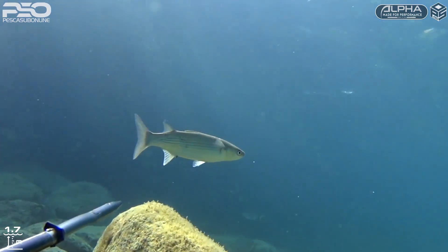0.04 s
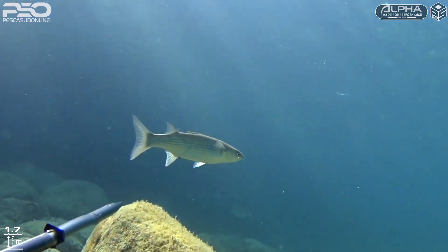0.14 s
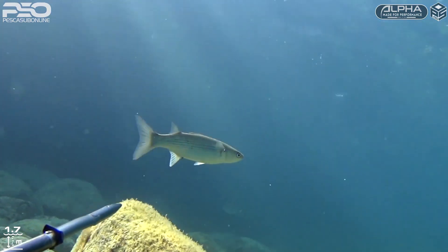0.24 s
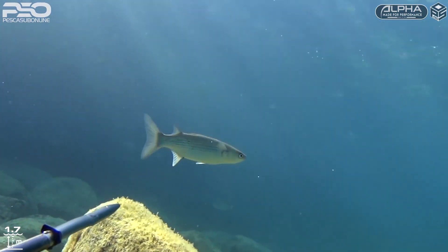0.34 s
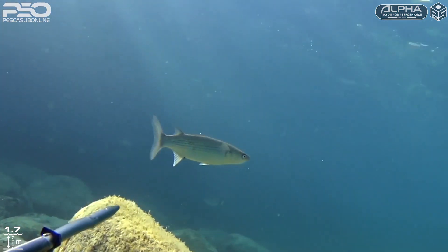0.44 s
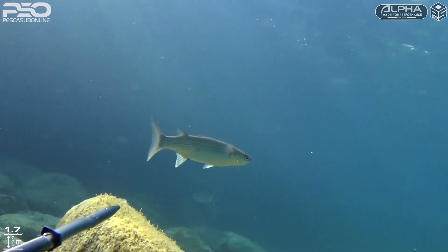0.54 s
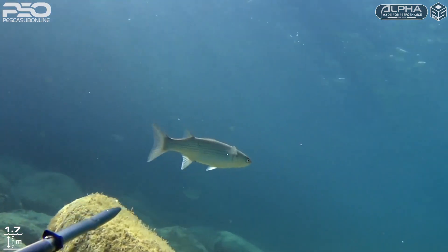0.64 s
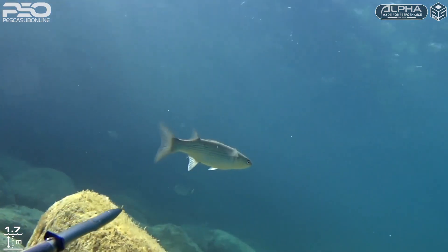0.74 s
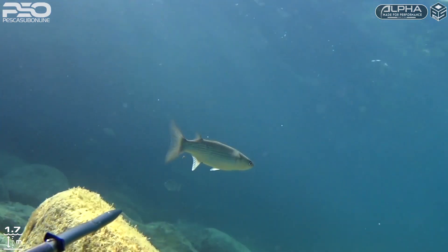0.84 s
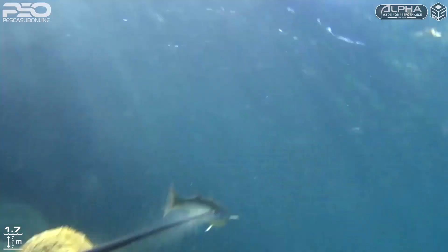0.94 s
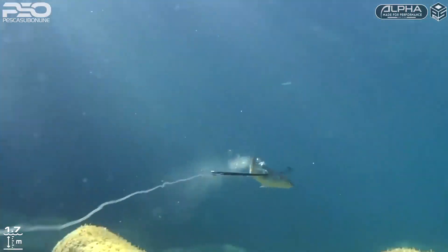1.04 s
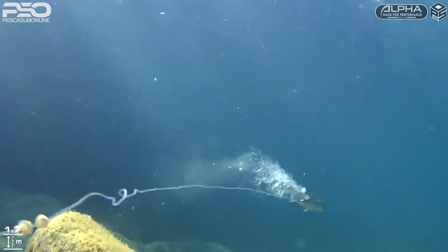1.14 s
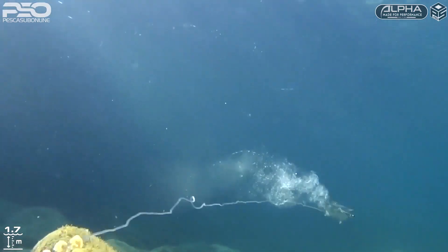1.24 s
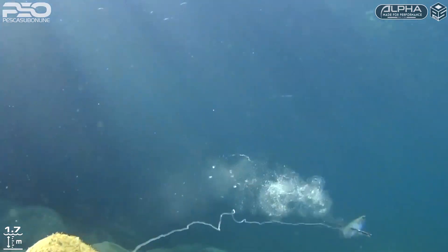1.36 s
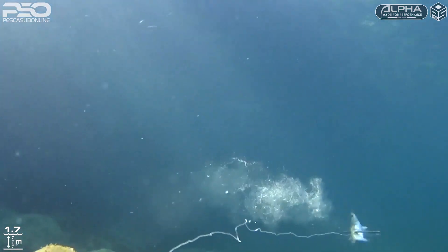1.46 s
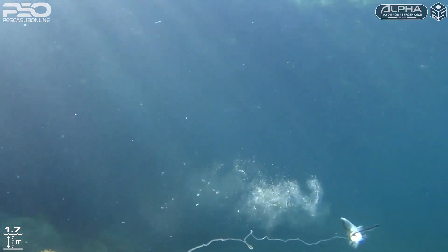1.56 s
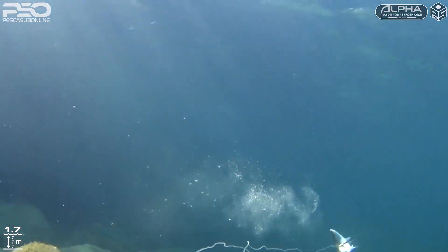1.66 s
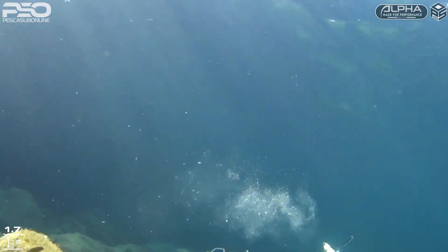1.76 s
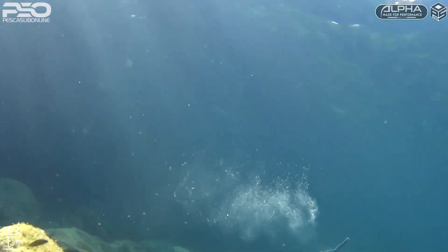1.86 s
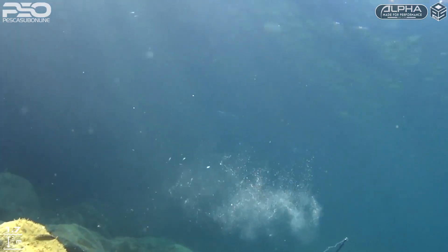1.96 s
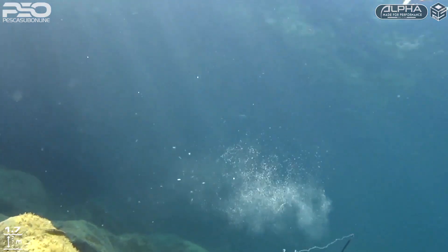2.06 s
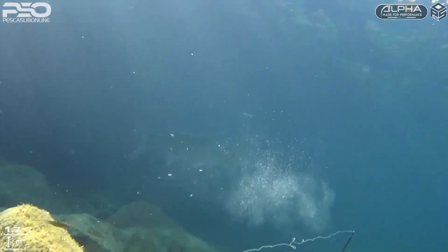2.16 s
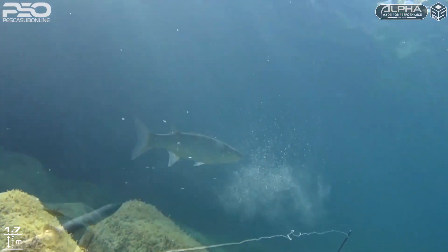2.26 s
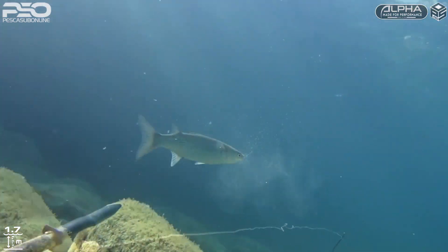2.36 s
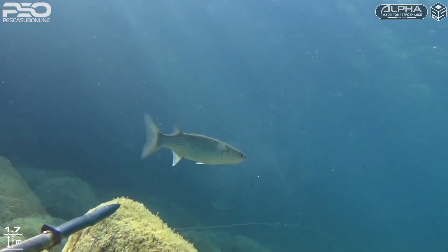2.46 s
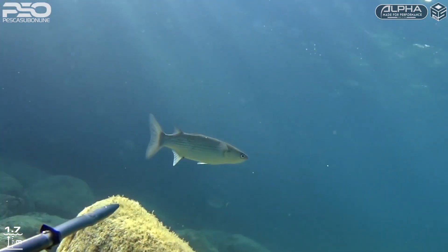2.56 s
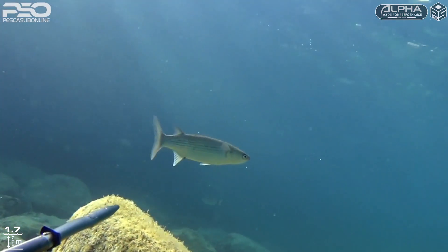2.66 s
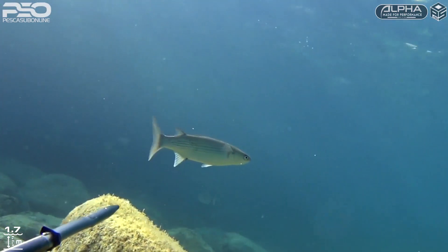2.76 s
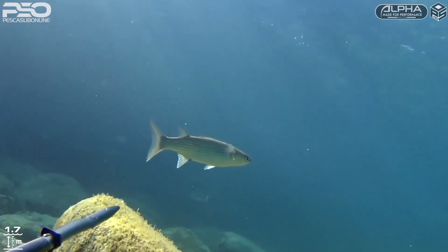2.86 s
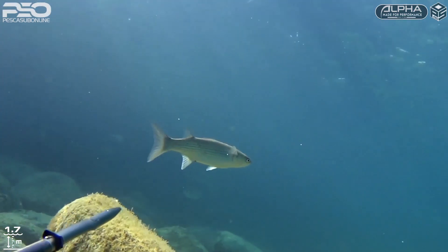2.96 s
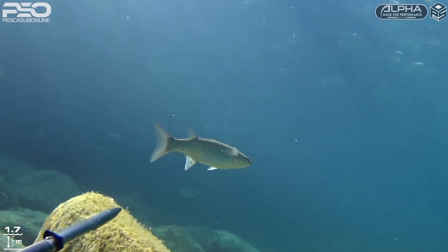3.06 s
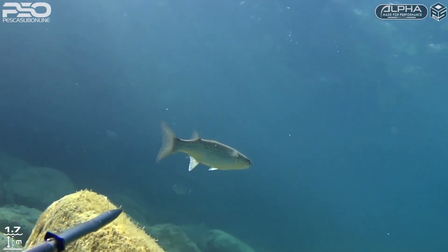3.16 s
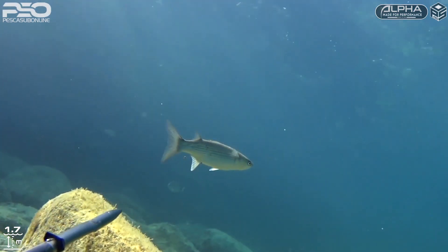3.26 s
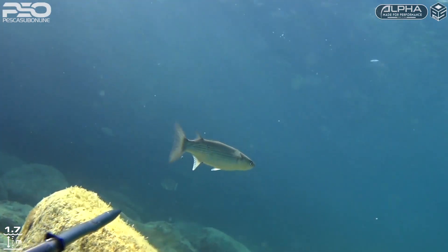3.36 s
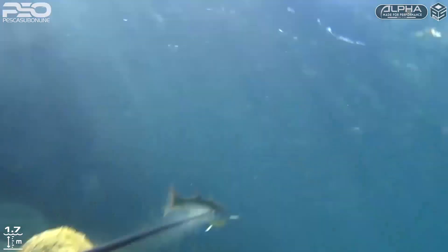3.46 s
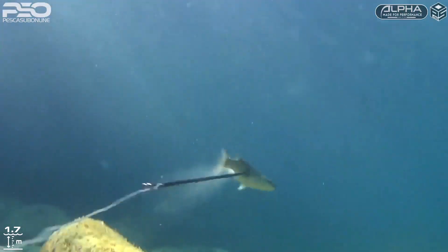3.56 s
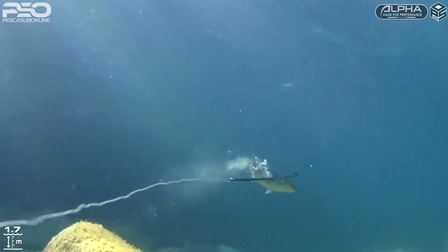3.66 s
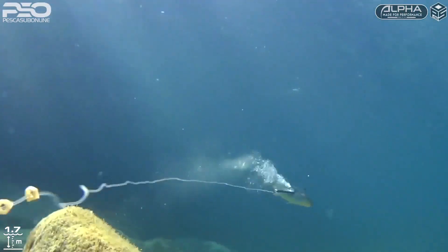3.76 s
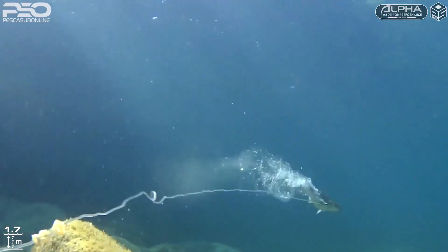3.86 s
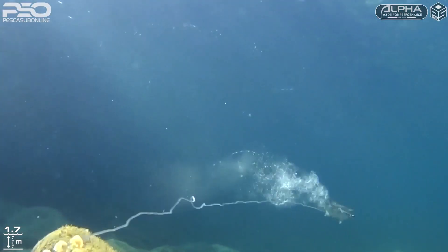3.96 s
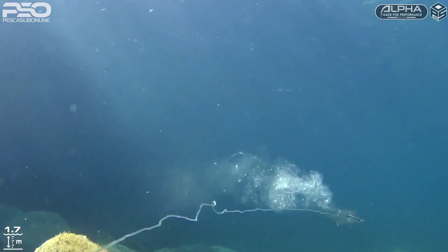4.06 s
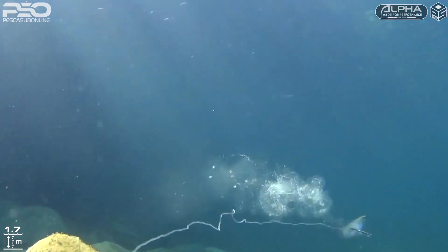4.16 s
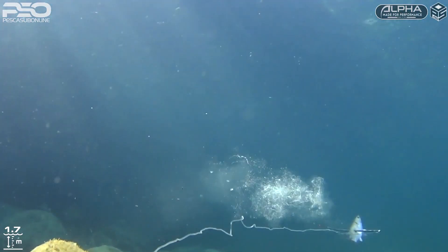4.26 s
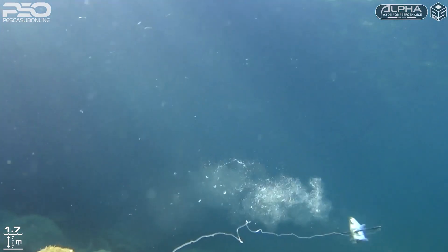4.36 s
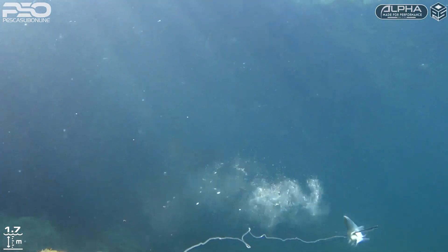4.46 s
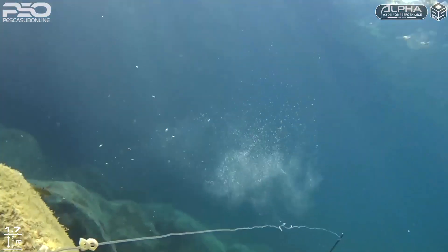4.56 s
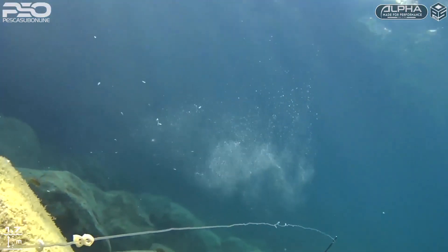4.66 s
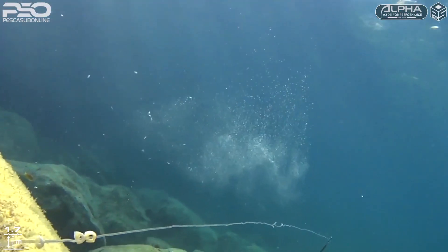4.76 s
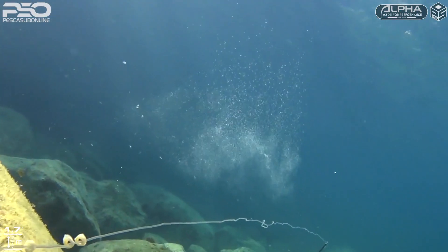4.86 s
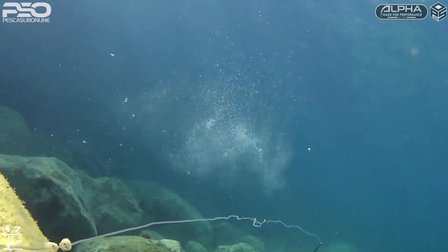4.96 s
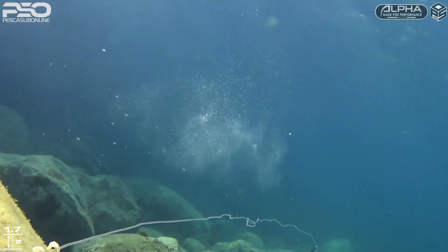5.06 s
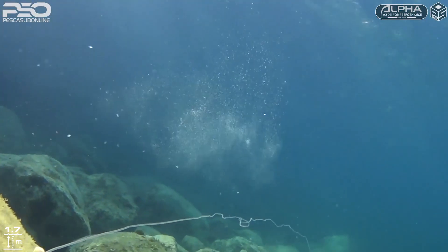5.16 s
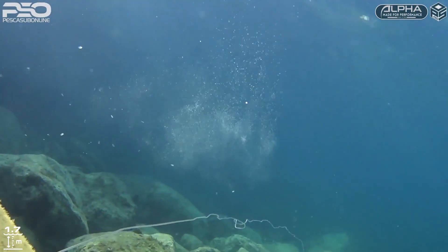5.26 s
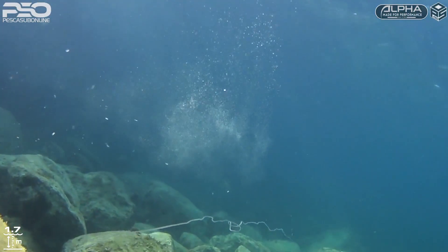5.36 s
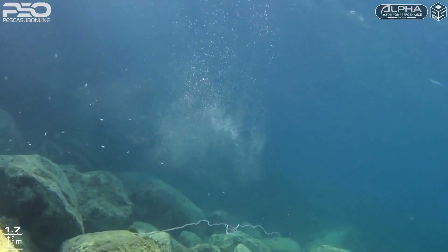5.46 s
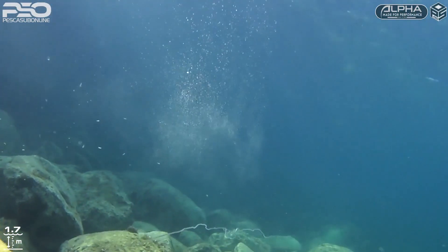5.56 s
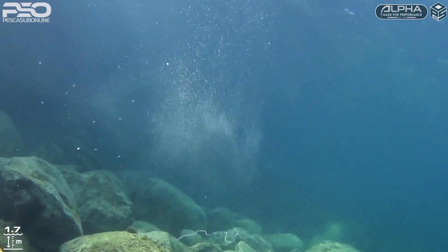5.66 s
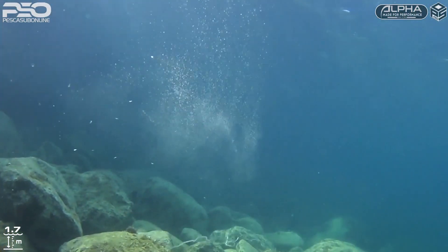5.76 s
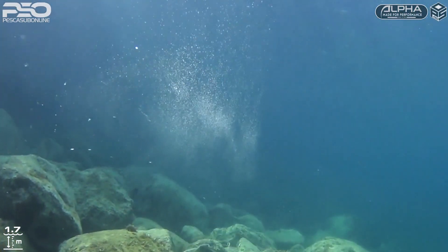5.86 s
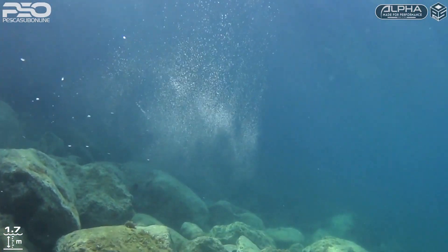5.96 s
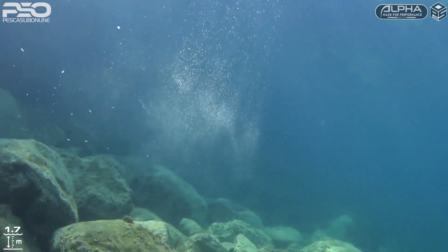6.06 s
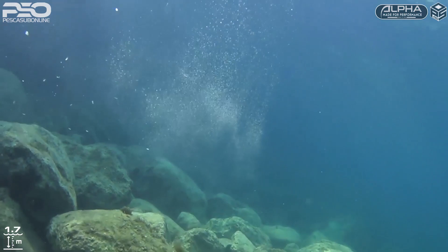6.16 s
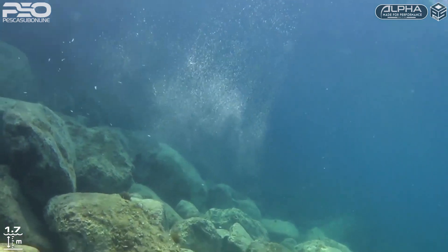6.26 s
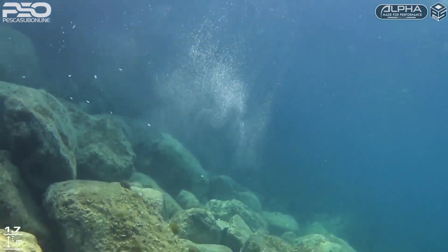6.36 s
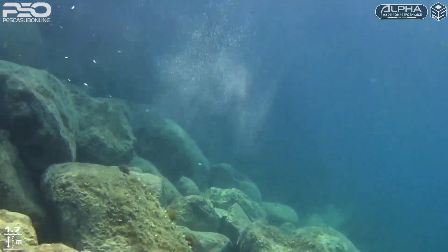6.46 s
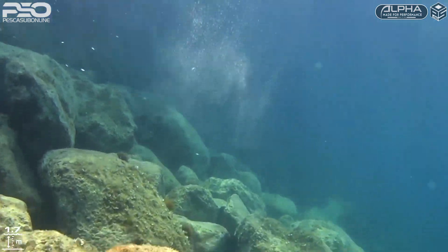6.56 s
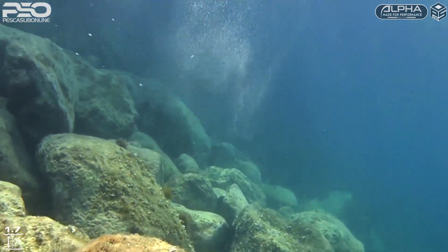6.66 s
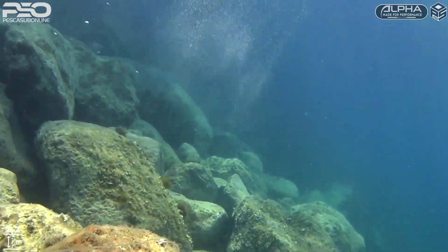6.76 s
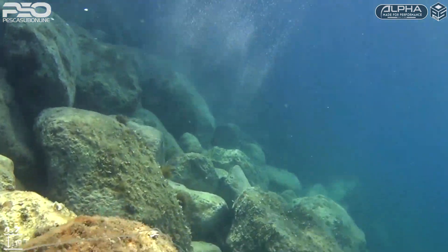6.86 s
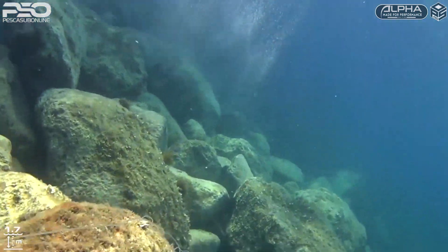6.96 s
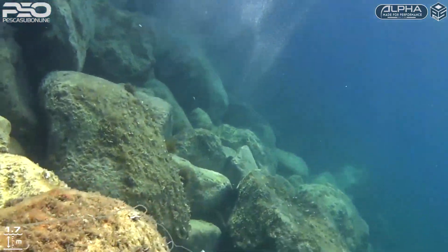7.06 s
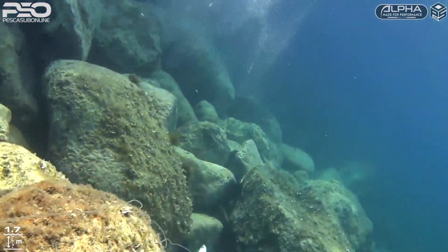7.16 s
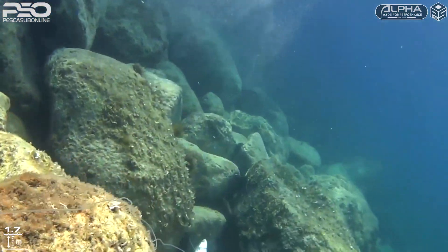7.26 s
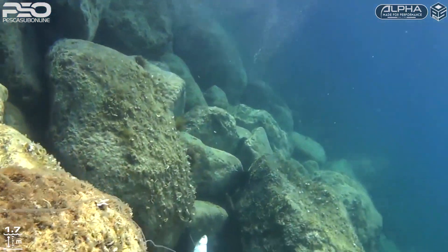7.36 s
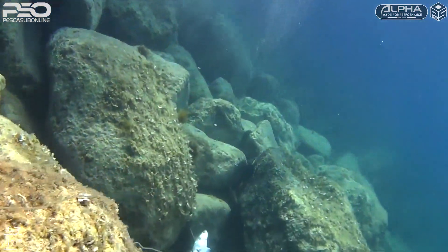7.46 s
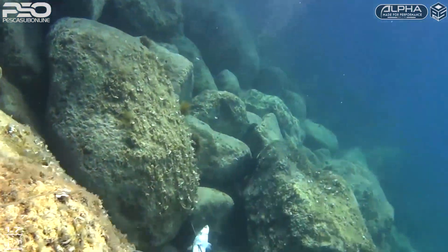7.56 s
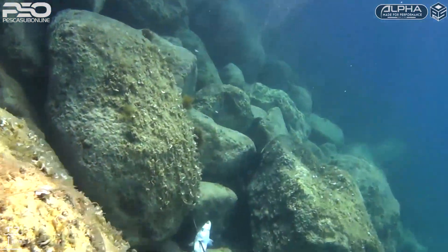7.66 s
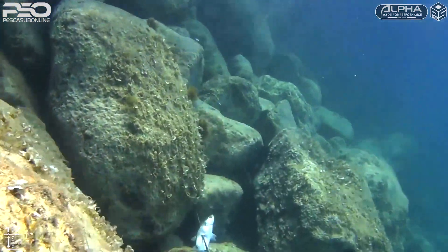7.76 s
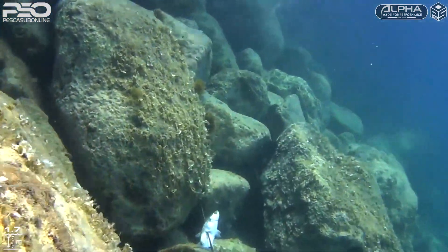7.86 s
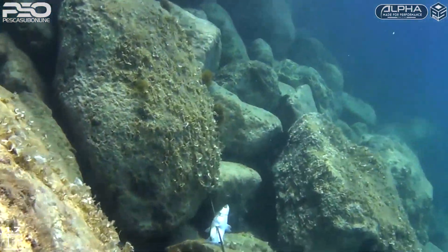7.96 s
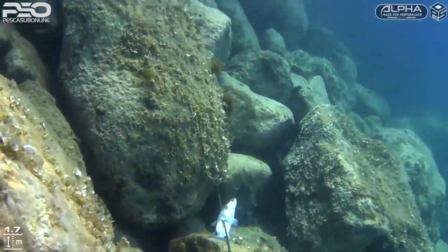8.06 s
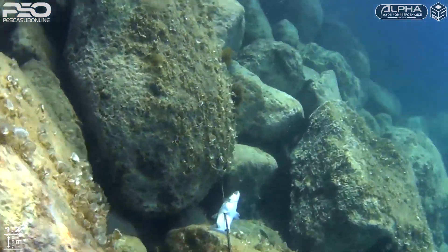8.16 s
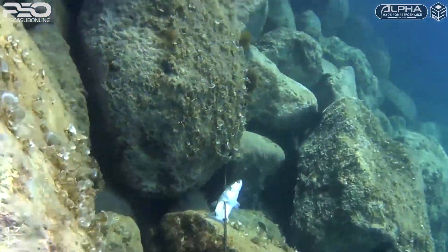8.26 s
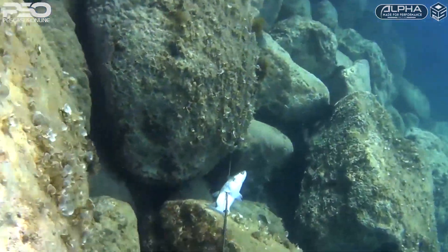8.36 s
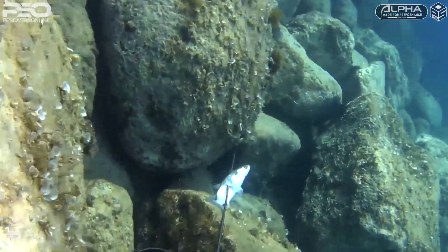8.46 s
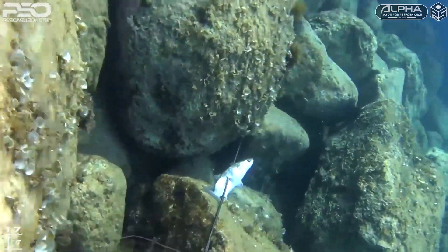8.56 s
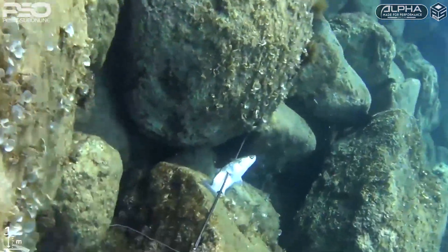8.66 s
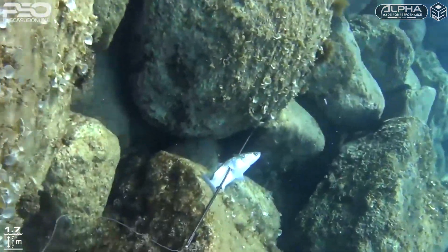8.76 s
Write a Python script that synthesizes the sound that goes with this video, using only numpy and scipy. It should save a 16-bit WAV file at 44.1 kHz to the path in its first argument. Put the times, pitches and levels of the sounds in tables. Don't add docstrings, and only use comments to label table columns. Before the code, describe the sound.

Shallow sea among rocks, heard by a camera in a sealed housing close to a speargun. Quiet hiss and faint knocks, then a sudden clipped blast with steel cracks and churned water, followed by rattling line. The same shot returns slower and deeper. Afterwards line rubs and tugs with hollow knocks, shrimp snap in the distance, and swimming water rumbles louder toward the end.

```python
import sys
import numpy as np
from scipy import signal
from scipy.fft import rfft, irfft
from scipy.io import wavfile
from scipy.ndimage import uniform_filter1d, map_coordinates

SR = 44100
rng = np.random.default_rng(int(sys.argv[2]) if len(sys.argv) > 2 else 0)


def voltage_ratio(level):
    return 10 ** (np.asarray(level, float) / 20)


def output_pcm(signal):
    pcm = np.clip(np.atleast_2d(signal).T, -1, 1) * 32767
    wavfile.write(sys.argv[1], SR, np.round(pcm).astype(np.int16))


N = 388857

CUT_S, SWIM_S = 2.4, 4.555
SLOW, SHOT_S, REPEAT_S = 0.6, 0.94, 3.416402
SWIM_SPEED = 0.787
EDGE_HZ = 11000

# (frequency [Hz], density [dB per Hz])
HISS_MID_SPECTRUM = [(88, -50.5), (150, 5), (189, 3.5), (275, -0.5), (365, 0.5), (730, -3), (970, -3),
                     (1540, -9), (6730, -15.5), (10500, -16.5), (13600, -38.5), (22000, -120)]
# (frequency [Hz], density [dB per Hz])
HISS_SIDE_SPECTRUM = [(88, -51.5), (150, 3.5), (226, -6), (295, 4), (340, -6.5), (460, -3.5), (826, -6),
                      (1360, -11), (1940, -15.5), (10500, -35.5), (13600, -36.5), (22000, -120)]
HISS_DB, HISS_SIDE_DB = -68, -60.5
SWIM_HISS_DB, HISS_GROWTH_DB_PER_S = -69.5, 1.11
# (time [s], flow level [dB])
FLOW = [
    [(0, -76.5), (.5, -64.5), (.84, -77.5), (.95, -50), (1.5, -55), (1.8, -60), (2.4, -65.5)],
    [(4.55, -54.5), (4.68, -76.5), (4.85, -54.5), (5.3, -73), (6.0, -73), (6.5, -54.5), (6.85, -61),
     (7.15, -48), (7.85, -47), (8.45, -39), (8.82, -45)],
]
GUST_S, GUST_DB = 0.024, 0.5
SWELL_DB, SWIM_SWELL_DB = -54.5, -53
DRAG_DB = -12
# (frequency [Hz], density [dB per Hz])
SURGE_SPECTRUM = [(8, 12), (25, -8), (50, -6), (90, -32)]
# (frequency [Hz], density [dB per Hz])
RUMBLE_SPECTRUM = [(26, -38), (45, 1), (70, 0), (130, -4.5), (212, -15), (327, -28.5), (500, -30),
                   (650, -48), (1100, -120)]
# (frequency [Hz], density [dB per Hz])
WASH_SPECTRUM = [(70, -30), (140, 8), (330, -1), (520, -15), (800, -45)]
WASH_DB, WASH_FLOW_DB, WASH_POWER = -53.5, -39.5, 1.37
# (time [s], frequency [Hz], level [dB])
MOAN = [
    (7.93, 400, -72),
    (8.05, 460, -61.5),
    (8.14, 513, -65),
    (8.2, 574, -77),
]
JOLT_DB, JOLT_T60_S, ROCK_HZ, ROCK_WIDTH_HZ, ROCK_MID_DB = -9.5, 0.15, 211, 53, -3.5
# (time [s], peak level [dB], centre [Hz])
SHRIMP_SNAPS = [(.1446, -58, 5740), (.382, -52, 6230), (.6998, -64, 4750), (1.6879, -53, 5250),
                (1.8156, -54, 7800), (2.1598, -55, 5700), (2.2317, -60, 8170), (2.2666, -54, 5540),
                (4.549, -59, 3720), (4.796, -50, 4430), (4.943, -51, 4100), (5.278, -51, 4440),
              (5.409, -49, 4260), (5.4347, -52, 4810), (5.682, -50, 4180), (5.9751, -58, 4260),
              (6.204, -50, 4250), (6.4266, -52.5, 6200), (6.593, -42.5, 4600), (6.726, -47, 4500),
              (6.9594, -52, 4350), (7.655, -48, 4600), (7.832, -47, 4600), (7.8777, -50.5, 5400),
              (7.99, -53, 4360), (8.107, -48.5, 4640), (8.301, -47, 4540), (8.522, -37, 4300),
              (8.5533, -54, 5240), (8.6735, -49, 4750), (8.71, -49, 4680)]

# (frequency [Hz], width [Hz], level [dB])
GUN_MODES = [
    [(380, 98, -1.5), (497, 96, -8.5)],
    [(980, 70, -5)],
]
# (frequency [Hz], width [Hz], level [dB])
SWIM_GUN_MODES = [
    [(287, 68, -4), (174, 78, -5), (620, 100, -16.5)],
    [(765, 66, 0.17), (638, 76, -2.2)],
]
# (start [s], length [s], low mode level [dB], high mode level [dB])
RUBS = [(0.045, 0.025, -52, -86), (0.094, 0.036, -97, -59), (0.427, .1, -89, -90), (0.676, 0.07, -91, -72),
        (0.867, 0.088, -80, -72), (1.47, 0.89, -68.5, -70.5), (4.562, 0.4, -81, -72),
        (4.772, 0.12, -48, -78), (4.996, 0.11, -54, -60.5), (5.112, 1.5, -59.5, -72),
        (6.388, 0.3, -63.5, -66.5), (7.106, 0.79, -84, -67), (7.945, 0.32, -61, -66),
        (8.364, 0.61, -75, -69.5)]
RUB_ATTACK_S, RUB_RELEASE_S = 0.034, 0.018
SCRAPE_DB, SCRAPE_T60_S = -25, 0.5
# (time [s], peak level [dB], ring [Hz], tick against ring [dB])
EARLY = [(0.056, -50.5, 454, -28), (0.073, -53.5, 292, -23), (0.116, -71, 980, -20), (0.146, -63, 990, 4),
         (0.427, -60, 390, -23), (0.519, -64, 254, -17), (0.7, -57, 1050, 5.5)]
# (time [s], peak level [dB], ring [Hz], tick against ring [dB])
RATTLE = [(1.1634, -53, 853, -34.5), (1.2148, -42, 940, -16), (1.2171, -43, 545, -38),
          (1.2601, -42.5, 620, -38), (1.2608, -30, 424.5, -52), (1.3214, -52, 870, -29),
          (1.3523, -52, 960, -22), (1.3751, -55.5, 485, -30.1), (1.3971, -40, 450, -38),
          (1.4703, -59.5, 330.5, -30.1), (1.4896, -54, 139, -40.1), (1.5391, -58.5, 701, -25),
          (1.5904, -50, 198, -30.1), (1.8193, -56, 374, -22.1), (1.903, -50, 324, -28.1),
          (1.925, -51.5, 264, -28.1), (2.0791, -60, 387, -13), (2.3761, -58, 484, -26.1)]
# (time [s], peak level [dB], ring [Hz], tick against ring [dB])
TUGS = [(4.649, -64, 345, -12), (4.804, -40, 279, -32), (4.849, -45, 329, -30), (5.005, -40.5, 281, -27),
        (5.173, -58, 291, -25), (5.198, -50, 294, -31), (4.858, -53, 169, -33), (5.065, -60, 280, -27),
        (5.437, -51, 163, -35), (5.467, -55, 182, -35), (5.504, -60, 156, -35), (5.625, -56, 265, -30),
        (5.668, -66, 179, -30), (5.306, -51, 285, -27), (5.369, -54.5, 297, -17), (5.429, -51, 278, -24.5),
        (5.494, -44, 283, -33), (5.606, -51, 265.5, -26), (5.809, -53, 285, -27), (6.055, -56, 179, -29),
        (6.233, -49.5, 287, -32), (6.429, -54, 302, -30), (6.52, -52, 280, -30), (5.88, -50, 290, -25),
        (5.965, -55, 275, -18), (6.017, -48, 262, -27), (6.168, -56, 278, -24), (6.203, -50.5, 287, -16),
        (6.305, -64, 308, -22), (6.412, -49.5, 289, -25), (6.549, -45.5, 267, -13), (6.61, -52.5, 280, -25)]
# (time [s], peak level [dB], ring [Hz], tick against ring [dB])
PINGS = [(4.853, -58, 793, -25), (5.045, -60, 755, -25), (5.808, -63, 686, -25), (5.88, -65, 657, -28),
         (5.965, -70, 650, -25), (6.028, -60, 665, -20), (6.095, -66, 710, -25), (6.58, -54, 646, -25),
         (6.4, -49, 714, -25), (6.518, -49, 596, -27), (6.555, -54.5, 665, -23), (7.127, -62.5, 810, 8),
         (7.325, -57.5, 590, -18.5), (7.444, -56, 765, 0), (7.515, -57.5, 715, -20), (7.555, -58, 770, -5),
         (7.624, -57, 740, -3), (7.746, -45.5, 748, -37), (7.345, -62, 780, -20), (7.378, -62, 745, -20),
         (7.96, -74, 780, -20), (8.172, -67, 760, -20), (8.04, -59.5, 710, -26), (8.104, -52.5, 754, -24),
         (8.228, -57.5, 660, -18)]
# (time [s], peak level [dB], ring [Hz], tick against ring [dB])
TAPS = [(6.5, -53, 640, -19), (5.003, -63, 990, -25), (4.4, -54, 640, -19), (5.2764, -45, 670, -10),
        (5.2783, -49, 970, -21), (5.279, -54, 1260, -21), (5.2763, -62, 2130, -5), (4.5, -47, 750, -17),
        (3.8, -61, 810, -18), (6.3955, -41, 620, -25)]
# (time [s], peak level [dB], centre [Hz])
CLICKS = [(.6991, -50, 1300), (1.108, -25, 2200), (1.1845, -35, 1300), (1.2135, -45, 1600),
          (1.2185, -47, 1500), (1.2615, -48, 1700), (1.29, -58, 1700), (1.3215, -47, 1100),
          (1.397, -53, 1100), (1.41, -56, 1400), (2.085, -62, 1080), (2.266, -60, 1150), (4.79, -53, 800),
          (5.001, -48, 900), (5.277, -49, 2300), (5.434, -46, 1000), (6.396, -48, 900), (6.3965, -54, 4000),
          (6.518, -51, 700), (8.228, -50, 900)]

# (time [s], violence [dB])
CHURN = [
    (.951, 2.5),
    (.968, 1),
    (1.02, 0.5),
    (1.045, -10),
    (1.095, -13),
    (1.125, -28),
    (1.175, -26.5),
    (1.225, -34.5),
    (1.5, -55.5),
]
# (level at full violence [dB], slope [dB per dB])
CHURN_LAW = [
    (-25, 0.6),
    (-25.5, 0.94),
    (-40, 1.4),
    (0.5, -0.08),
]
# (frequency [Hz], density [dB per Hz])
HEAVE_SPECTRUM = [(15, -10.5), (45, -8.5), (90, 5.5), (150, -3.5), (250, -55)]
# (frequency [Hz], density [dB per Hz])
ROAR_SPECTRUM = [(88, -33), (150, 0.5), (194, -3), (319, -4.5), (475, -14.5), (535, -12.5), (950, -11),
                 (1350, -24.5), (2500, -38), (3250, -60.5), (5500, -120)]
# (frequency [Hz], density [dB per Hz])
FIZZ_SPECTRUM = [(1060, -23.5), (1800, 4.5), (2140, -20), (3460, -12), (4880, -8.5), (7540, -13.5),
                 (9370, -24.5), (10800, -37.5), (14000, -69.5), (22000, -120)]
# (time [s], peak level [dB], centre [Hz])
GLINTS = [(1.0265, -36, 6000), (1.062, -39, 6000), (1.084, -41, 4860), (1.128, -54, 5700),
          (1.143, -51, 3180), (1.152, -55, 2900), (1.156, -57, 7200), (1.16, -54, 6000), (1.18, -60, 6500),
          (1.212, -55, 4400), (1.265, -62, 5800), (1.33, -60, 8400), (1.385, -62, 8400), (1.48, -60, 7900),
          (1.62, -62, 8100), (1.74, -62, 5900), (2.07, -62, 6200), (2.31, -62, 8100)]
# (frequency [Hz], width [Hz], level [dB])
QUIVER = [(5700, 220, 0), (6770, 200, -5), (8050, 200, -2), (8380, 160, -2)]
QUIVER_DB = -90
# (time [s], peak level
# [dB], centre [Hz])
CRACKS = [(0.9533, -17, 2876), (0.958, -14, 4840), (0.9624, -21.5, 2496), (0.9684, -33.5, 2930),
          (0.9786, -41.5, 2524), (0.9862, -42, 2565), (0.9944, -28.5, 2548), (0.9988, -19.5, 4900),
          (0.9992, -19.5, 8850), (1.0108, -31, 5890), (1.0151, -31, 2476), (1.027, -40.5, 5770),
          (1.0433, -35.5, 2770), (1.062, -42, 6130), (1.066, -26, 3003), (1.0846, -46, 4620),
          (1.0465, -28, 2120), (1.052, -42.5, 4750), (1.057, -35, 2900), (1.0715, -34, 3000),
          (1.076, -36, 4890), (1.079, -42.5, 2390), (1.089, -44, 3200), (1.0935, -50, 3400),
          (1.1025, -42, 1700), (1.035, -34.5, 2800), (1.1083, -22, 3000), (1.213, -49, 4300)]
# (time [s], peak level [dB], ring [Hz], tick against ring [dB], left-right [dB])
RECOIL = [(.9535, -22, 380, -10, -0.5), (.955, -13, 850, -16.5, 2.5), (.963, -21, 565, -31.5, 2),
          (.978, -19, 433, -14.5, -4.5), (.987, -24, 596, -25.5, 9), (.991, -26, 1080, -26.5, -2),
          (.997, -15.5, 1280, -10.5, 1), (1.012, -21, 794, -30, 9.5), (1.015, -34.5, 390.4, -23, 1.5),
          (1.017, -19, 890, -20.5, -1.5), (1.025, -21, 544, -23.5, 5), (1.038, -25.5, 398.5, -20.5, 1.5),
          (1.045, -28.5, 1266, -17.5, 2), (1.062, -25, 390, -17.5, 2), (1.071, -33, 940, -9.5, 18),
          (1.094, -58, 820, -8, -18), (1.102, -34, 388, -34, -7.5), (1.108, -19, 845, -26, 4.5),
          (.9545, -21, 1500, -22.5, 1), (.96, -21.5, 1900, -23.5, -0.5), (.9655, -26, 1490, -21, 2.5),
          (.9795, -19.5, 1300, -24.5, -2.5), (.994, -24.5, 1700, -24.5, 3.5),
          (1.019, -21.5, 1360, -23.5, 2.5), (1.0645, -28, 1200, -19.5, 0), (1.1085, -28, 1590, -15, 9)]
# (time [s], peak level [dB], frequency [Hz], driven [s], t60 [s])
SLAMS = [
    (0.955, -9.5, 194, 0.0082, 0.037),
    (.9774, 6.5, 184, .0135, .0028),
    (1.1, -18.5, 200, 0.0088, 0.067),
]
# (time [s], peak level [dB], frequency [Hz], driven [s], t60 [s])
SHELL = [(.955, -23, 886, 0.0073, .008), (1.0115, -16.5, 553, 0.0037, 0.0066),
         (1.0204, -7, 333.4, 0.0105, 0.0051), (1.0176, -6.5, 858, 0.0014, 0.0049),
         (1.04, -21.5, 417, 0.0037, .01), (1.144, -36.5, 346, 0.012, 0.025), (1.16, -43, 859, 0.012, 0.027)]
# (time of the top [s], peak level [dB], width [s])
PUSHES = [(0.975, -3.5, 0.0035), (1.008, -18.5, 0.0014), (1.0347, -5, 0.0017), (1.068, -10, 0.0026),
          (1.114, -26, 0.002), (1.131, -20.5, 0.0015), (0.9539, -9.5, 0.0021), (1.0002, -10.5, 0.0011),
          (0.9646, -9.5, .001), (1.0487, -10.5, .0012), (1.098, -23, .002), (1.489, -39.5, 0.0059),
          (1.505, -49, .003), (1.597, -46, 0.00093), (1.612, -51, 0.0016), (1.625, -46, 0.0064)]
# (time of the top [s], peak level [dB], width [s])
PULLS = [(0.9524, -9, 0.00045), (0.9782, -11.5, 0.00057), (.961, -11, 0.0026), (1.0032, -13.5, 0.0024),
         (1.010, -12.5, 0.002), (1.0383, -9.5, 0.002), (1.055, -19.5, 0.0011), (1.080, -18, 0.0013),
         (1.499, -33.5, .0025), (1.6, -38, 0.0013), (1.61, -45, 0.0013)]
PUSH_LEAN = 0.11
KICK_S, KICK_DB, KICK_WIDTH_S, KICK_LEAN = 0.9531, -4.5, 0.0011, 0.7


def evened(x):
    return x / np.sqrt(np.mean(x ** 2) + 1e-20)


def coloured(points, speed=1, count=N):
    hz = np.fft.rfftfreq(count, 1 / SR) / speed + 1e-3
    f, db = np.transpose(points)
    gain = voltage_ratio(np.interp(np.log(hz), np.log(f), db, -90, -90))
    return evened(irfft(rfft(rng.standard_normal(count)) * gain, count))


def lumps(s, depth_db):
    size = max(int(s * SR), 2)
    drift = uniform_filter1d(uniform_filter1d(rng.standard_normal(N), size), size)
    return evened(voltage_ratio(depth_db * evened(drift)))


def gains(tables):
    t = np.arange(N) / SR
    out = 0
    for s, *columns in map(np.transpose, tables):
        out = out + np.array([voltage_ratio(np.interp(t, s, db, -150, -150)) for db in columns])
    return uniform_filter1d(out, size=60, axis=1)


def resonate(x, hz, width):
    turn = np.exp(2j * np.pi * np.cumsum(hz * np.ones(len(x))) / SR)
    r = np.exp(-np.pi * width / SR)
    once = signal.lfilter([1 - r], [1, -r], x / turn)
    twice = signal.lfilter([1 - r], [1, -r], once)
    return 2 * (turn * twice).real


def ports(mid, side):
    return np.array([mid + side, mid - side])


def add(mix, s, sound):
    part = mix[:, round(s * SR):][:, :sound.shape[1]]
    part += sound[:, :part.shape[1]]


def wake(rows, t60):
    t = np.arange(N) / SR
    out = 0
    for s, db, *_ in rows:
        u = np.maximum(t - s, 0)
        out = out + voltage_ratio(db - 60 * u / t60) * np.minimum(u / 0.0013, 1)
    return out


def hiss():
    full, slow = (ports(voltage_ratio(HISS_DB) * coloured(HISS_MID_SPECTRUM, v),
                        voltage_ratio(HISS_SIDE_DB) * coloured(HISS_SIDE_SPECTRUM, v)) for v in (1, SWIM_SPEED))
    t = np.arange(N) / SR
    grown = voltage_ratio(SWIM_HISS_DB + HISS_GROWTH_DB_PER_S * (t - SWIM_S) + 2.0 - HISS_DB)
    return np.where(t < CUT_S, full, grown * slow) * lumps(0.03, 0.61)


def water(surge, rumble):
    out = 0
    for gain, points, lean, lead, apart in ((surge, SURGE_SPECTRUM, 0.2, 0.4, 0.25),
                                            (rumble, RUMBLE_SPECTRUM, 0.15, 0.3, 0.4)):
        mid = coloured(points)
        side = -lean * mid + lead * signal.hilbert(mid).imag + apart * coloured(points)
        out = out + gain * lumps(0.029, 0.47) * ports(mid, side)
    return out


def wash(flow):
    gain = voltage_ratio(WASH_DB) * (flow / voltage_ratio(WASH_FLOW_DB)) ** WASH_POWER * lumps(0.01, 2.5)
    gain = gain * (np.arange(N) > SWIM_S * SR)
    return gain * ports(coloured(WASH_SPECTRUM), 0.73 * coloured(WASH_SPECTRUM))


def moan():
    t = np.arange(N) / SR
    s, hz, db = np.transpose(MOAN)
    whistle = evened(resonate(rng.standard_normal(N), np.interp(t, s, hz), 45.0))
    mid = voltage_ratio(np.interp(t, s, db, -150, -150)) * whistle
    return ports(mid, -0.2 * mid)


def rocking(gain):
    hz = ROCK_HZ * np.where(np.arange(N) < CUT_S * SR, 1, SWIM_SPEED)
    mid, side = (evened(resonate(d, hz, ROCK_WIDTH_HZ)) for d in rng.standard_normal((2, N)))
    return gain * ports(voltage_ratio(ROCK_MID_DB) * mid, side)


def sea():
    flow = gains(FLOW)[0] * lumps(GUST_S, GUST_DB)
    swell = np.where(np.arange(N) < CUT_S * SR, voltage_ratio(SWELL_DB), voltage_ratio(SWIM_SWELL_DB)) * lumps(GUST_S, GUST_DB)
    jolts = voltage_ratio(JOLT_DB) * wake(EARLY + RATTLE + TUGS, JOLT_T60_S)
    return wash(flow) + water(swell + voltage_ratio(DRAG_DB) * flow, flow) + moan() + rocking(jolts)


def snaps(rows, width, t60, side, fall=0):
    out, t = np.zeros((2, N)), np.arange(1300) / SR
    for s, db, hz in rows:
        pitch = hz * (1 - fall * t / t60)
        a, b = (evened(resonate(rng.standard_normal(len(t)), pitch, width)) for _ in range(2))
        add(out, s - 0.0005, voltage_ratio(db - 11.0 - 60 * t / t60) * ports(a, side * b))
    return out


def shrimps():
    return snaps(SHRIMP_SNAPS, width=1400.0, t60=0.03, side=0.49)


def strokes():
    t = np.arange(N) / SR
    out = 0
    for s, length, *db in RUBS:
        attack, release = (t - s) / RUB_ATTACK_S, 1 + (s + length - t) / RUB_RELEASE_S
        held = np.clip(np.minimum(attack, release), 0, 1)
        out = out + voltage_ratio(np.array(db))[:, None] * held
    return out


def rubbing(levels):
    out, first = 0, np.arange(N) < CUT_S * SR
    for gain, *parts in zip(levels, GUN_MODES, SWIM_GUN_MODES):
        drive = rng.standard_normal((2, N)) * lumps(0.012, 2.8)
        full, slow = ([evened(sum(voltage_ratio(db) * resonate(d, hz, w) for hz, w, db in modes)) for d in drive]
                      for modes in parts)
        mid, side = np.where(first, full, slow)
        out = out + voltage_ratio(-4.0) * gain * ports(mid, voltage_ratio(-10.0) * side)
    return out


def knocks(rows, cycles, rise, rough, side_db, upper, sag, hold):
    out, t = np.zeros((2, N)), np.arange(2600) / SR
    size = voltage_ratio(side_db)
    for (s, db, hz, tick_db, pan_db), phase in zip(rows, rng.random(len(rows))):
        lean = np.tanh(pan_db * np.log(10) / 20)
        lag = np.arccos(np.clip(lean * (1 + size ** 2) / (2 * size), -1, 1))
        shape = (1 - np.exp(-t * hz / rise)) * voltage_ratio(-60 * np.maximum(t * hz - hold, 0) / cycles)
        turn = 2 * np.pi * (hz * t + 3 * sag * (1 - np.exp(-t * hz / 3)) + phase)
        over = upper * voltage_ratio(-60 * t / 0.0027) * np.sin(1.2 * turn)
        ring = ports(np.sin(turn) + over, size * (np.sin(turn + lag) - over)) * shape / shape.max()
        ring = ring + 0.62 * rough * shape * np.sin(0.25 * turn)
        ring = ring * (1 + rough * evened(uniform_filter1d(rng.standard_normal(len(t)), size=150)))
        crack = voltage_ratio(-60 * t / 0.0084) * (1 - np.exp(-t / 0.00012))
        tick_mid = coloured(FIZZ_SPECTRUM, 0.91, count=len(t))
        tick_side = 0.3 * coloured(FIZZ_SPECTRUM, 0.76, count=len(t))
        add(out, s, voltage_ratio(db) * (ring + voltage_ratio(tick_db) * ports(tick_mid, tick_side) * crack))
    return out


def leaning(rows, lean_db, scatter_db):
    return [(*row, lean_db + scatter_db * (2 * u - 1)) for row, u in zip(rows, rng.random(len(rows)))]


def ticks(rows, cycles, side, rise):
    out, t = np.zeros((2, N)), np.arange(400) / SR
    for (s, db, hz), gap in zip(rows, rng.uniform(0.00065, 0.001545, len(rows))):
        onset = 1 - np.exp(-(t * hz / rise) ** 2)
        blow = voltage_ratio(db + 6 - 60 * t * hz / cycles) * np.sin(2 * np.pi * hz * t) * onset
        add(out, s, ports(blow, side * blow))
        add(out, s + gap, ports(-0.6 * blow, side * blow))
    return out


def line():
    low, high = strokes()
    scrape = voltage_ratio(SCRAPE_DB) * wake(EARLY + RATTLE + TUGS, SCRAPE_T60_S)
    rattle = knocks(leaning(RATTLE + EARLY + TAPS, -0.5, 2.5), cycles=8.0, rise=1.6, rough=0.047,
                    side_db=2.0, upper=0.77, sag=0.4, hold=4.0)
    tugs = knocks(leaning(TUGS, -3.1, 2.5), cycles=20.0, rise=0.4, rough=0.3,
                  side_db=-3.5, upper=0.9, sag=0.04, hold=4.5)
    pings = knocks(leaning(PINGS, -4.5, 3.0), cycles=40.0, rise=1.2, rough=0.15,
                   side_db=-3.5, upper=0.1, sag=0.06, hold=7)
    clicks = ticks(CLICKS, cycles=6.0, side=-0.3, rise=0.4)
    return rubbing([low + scrape, high]) + rattle + tugs + pings + clicks


def quiver():
    t = np.arange(N) / SR
    sing = 0
    for hz, width, db in QUIVER:
        sing = sing + voltage_ratio(db) * lumps(0.02, 5) * evened(resonate(rng.standard_normal(N), hz, width))
    return ports(sing, 0.3 * sing) * voltage_ratio(QUIVER_DB) * (t > CHURN[0][0]) * (t < CUT_S)


def churn():
    s, violence = np.transpose(CHURN)
    levels = [db + per_db * violence for db, per_db in CHURN_LAW]
    heave, roar, fizz, side = gains([np.transpose([s, *levels])])
    # gain, spectrum, lump length [s], lump depth [dB], share of the side
    layers = ((heave * voltage_ratio(-1.5), HEAVE_SPECTRUM, 0.01, 1.5, 0.9),
              (roar * voltage_ratio(4.0), ROAR_SPECTRUM, 0.003, 3.0, 1.1),
              (fizz * voltage_ratio(-5.0), FIZZ_SPECTRUM, 0.0015, 4.2, 0.45))
    out = 0
    for gain, points, length, depth_db, share in layers:
        out = out + gain * lumps(length, depth_db) * ports(coloured(points), side * share * coloured(points))
    return out


def recoil():
    out, t = np.zeros((2, N)), np.arange(N) / SR
    u = t[:4000]
    for s, db, hz, driven, t60 in SLAMS:
        shape = np.minimum(u * hz * 1.2, 1) * voltage_ratio(db - 60 * np.maximum(u - driven, 0) / t60)
        add(out, s, ports(0, shape * np.sin(2 * np.pi * hz * u)))
    for s, db, hz, driven, t60 in SHELL:
        shape = np.minimum(0.5 + 0.5 * u / driven, 1) * voltage_ratio(db - 60 * np.maximum(u - driven, 0) / t60)
        add(out, s, ports(0.68, -0.3)[:, None] * shape * np.sin(2 * np.pi * hz * u))
    v = (t - KICK_S) / KICK_WIDTH_S
    out += ports(0.3, -KICK_LEAN)[:, None] * voltage_ratio(KICK_DB) * v * np.exp(-v ** 2 / 2)
    for sign, rows in ((1, PUSHES), (-1, PULLS)):
        for s, db, width in rows:
            v = (t - s) / width
            pulse = voltage_ratio(db) * (1 - 0.14 * v ** 2) * np.exp(-v ** 2 / 2)
            out += sign * ports(0.76, -PUSH_LEAN)[:, None] * pulse
    return out


def shot():
    cracks = snaps(CRACKS, width=1800.0, t60=0.0085, side=0.35)
    glints = snaps(GLINTS, width=350.0, t60=0.04, side=0.3, fall=0.25)
    blows = knocks(RECOIL, cycles=9.0, rise=0.71, rough=0.54, side_db=6.0, upper=0.58, sag=0.05, hold=0.3)
    return churn() + recoil() + cracks + glints + quiver() + blows


def scene():
    return hiss() + sea() + shrimps() + line() + shot()


def low_pass(x):
    return signal.sosfilt(signal.butter(12, 11780, fs=SR, output="sos"), x)


def record(dry):
    t = np.arange(N) / SR
    pressure = signal.lfilter(*signal.butter(1, 14.0, "high", fs=SR), dry)
    loud = np.clip(pressure, -1, 1)
    bands = [signal.firwin(401, EDGE_HZ * v, window=("kaiser", 9), fs=SR) for v in (1, SWIM_SPEED)]
    full, swim = (signal.oaconvolve(loud, band[None], "same") for band in bands)
    at = (SHOT_S + SLOW * (t - REPEAT_S)) * SR
    repeat = np.array([map_coordinates(c, [at], order=5) for c in full])
    takes = np.where(t < CUT_S, full, np.where(t < SWIM_S, repeat, swim))
    return low_pass(np.clip(takes, -1, 1))


dry = scene()
out = record(dry)
output_pcm(out)
```